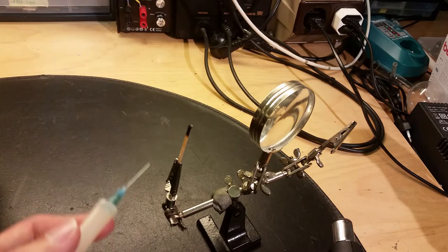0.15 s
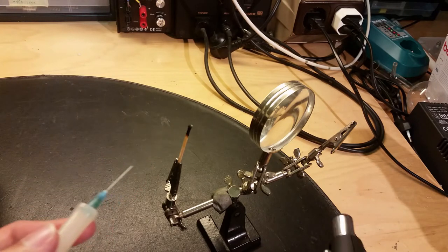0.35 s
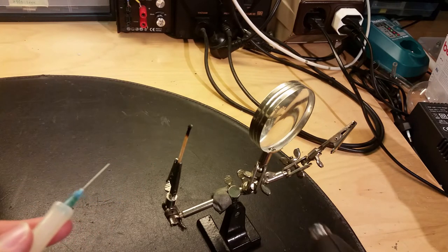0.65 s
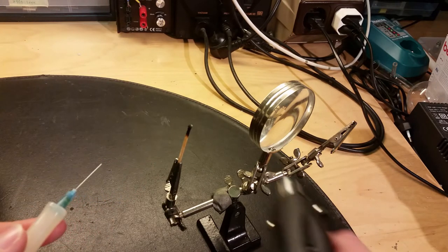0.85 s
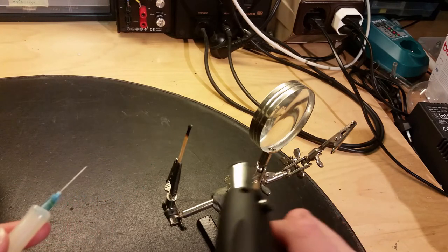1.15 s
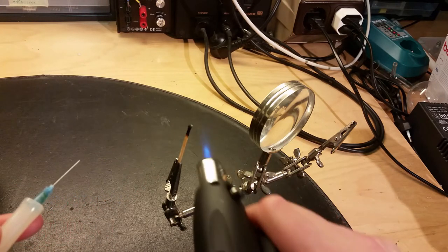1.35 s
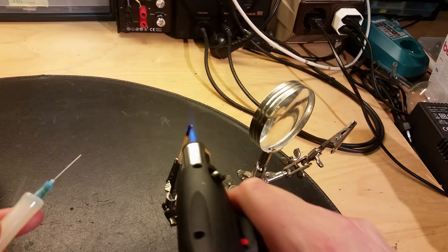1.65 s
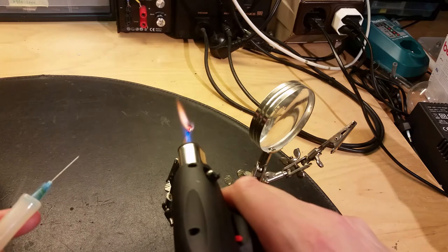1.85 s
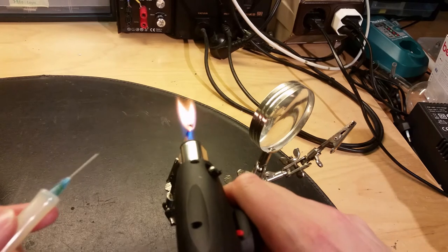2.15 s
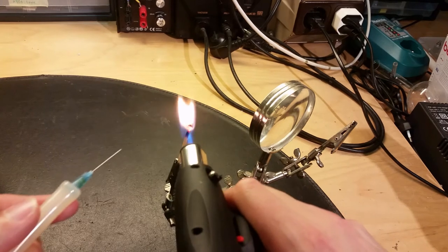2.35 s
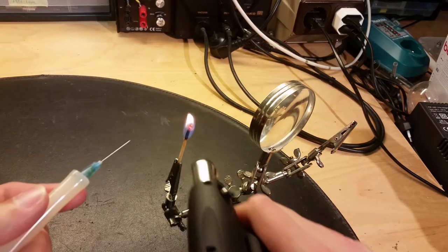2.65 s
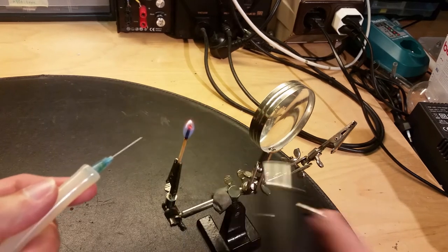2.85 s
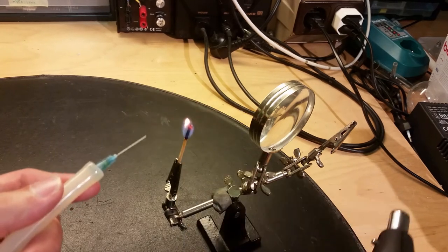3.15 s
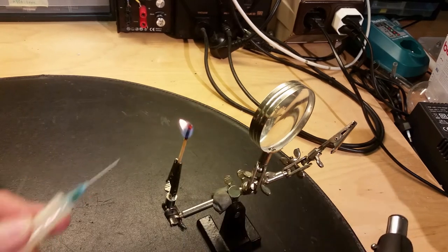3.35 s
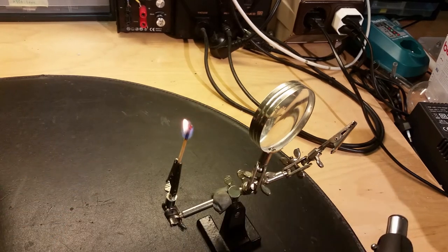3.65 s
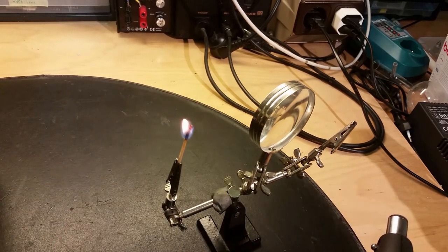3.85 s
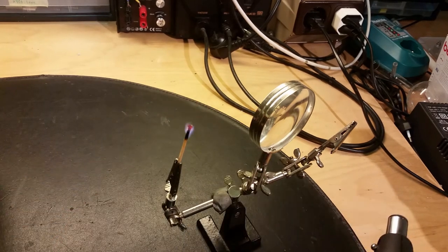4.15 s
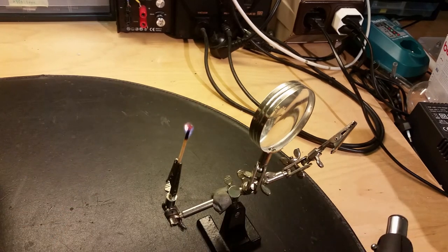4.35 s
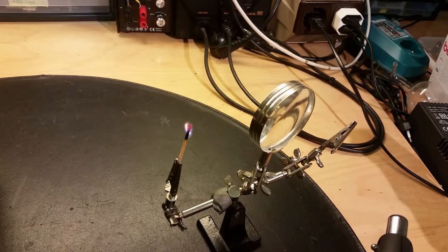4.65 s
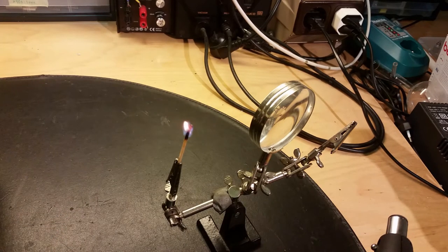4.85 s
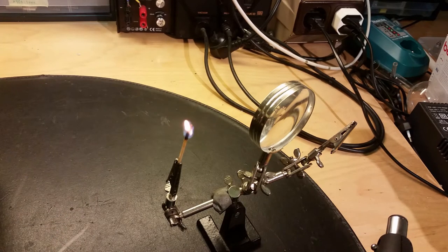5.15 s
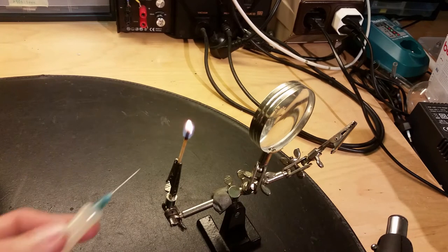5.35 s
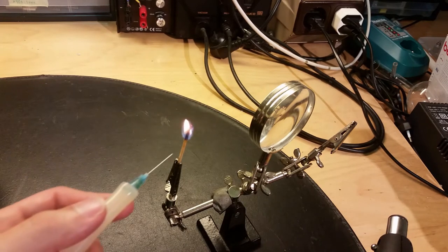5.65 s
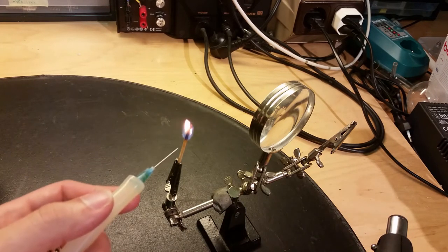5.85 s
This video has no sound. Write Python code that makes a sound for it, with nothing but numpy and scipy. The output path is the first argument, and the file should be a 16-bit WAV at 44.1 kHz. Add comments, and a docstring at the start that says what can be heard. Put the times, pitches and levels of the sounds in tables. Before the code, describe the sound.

Fast low pump chugging to the left; a gas torch snaps alight, rushes for a second, clicks off and is set down with a hiss.

```python
"""A small piston compressor throbs to the left: knocks ring its casing and air puffs through its valves.
Beside it a hand gas torch is picked up, unlatched, lit with a snap, burns for a second, clicks off
and is set down; a thin hiss follows. Soon after the lighting, compressor and flame sink, then recover.
Struck parts are sums of dying tones; air, gas and rubbing are coloured noise shaped in time."""
import sys
import numpy as np
from scipy import signal
from scipy.fft import rfft, irfft, next_fast_len
from scipy.io import wavfile
from scipy.ndimage import uniform_filter1d

SR = 44100
rng = np.random.default_rng(int(sys.argv[2]) if len(sys.argv) > 2 else 0)


def generate_wav(sig):
    """Save sig (samples, or channels by samples) to the path in sys.argv[1] as 16-bit PCM at SR."""
    pcm = np.round(np.clip(np.atleast_2d(sig).T, -1, 1) * 32767).astype(np.int16)
    wavfile.write(sys.argv[1], SR, pcm)


N = 265305
T = np.arange(N) / SR  # time (s)

# colour of the gas jet, also lent to the rustle of handling: f/Hz, level per Hz/dB
JET = [(1000, 3), (1500, 9.5), (2900, 1), (3900, 4), (5500, 2.5), (7200, 7), (9500, -3.5), (13000, -0.5),
       (14500, -11)]


def compressor():
    """Knocks, hum, valve puffs and rushing air are timed by one shaft; the motor whines above them."""
    # colour of the steady air hiss: f/Hz, level per Hz/dB
    air_colour = [(1500, -8.5), (3200, -1), (4000, 5.5), (5800, -4.5), (7450, 5.5), (8200, 1.5),
                  (10200, -43.5), (12300, -1.5), (14500, -9.5)]
    # level of the low throb over time: t/s, level/dB
    throb_level = [(0, 0), (.44, 0), (.52, -5), (1.4, -4.5), (2.3, 0.5), (6, -0.5)]
    knock_db, swell_db_per_s = -43, 0.5  # the knocks grow a little louder as it runs
    rush_db, compressor_db = -42.5, 2.78

    turn = shaft()
    knocks = casing(turn)
    body = knocks + undb(-14) * room(knocks, t60=.15)
    swelling_knocks = undb(knock_db + swell_db_per_s * T) * body
    throb = (swelling_knocks + shaft_hum(turn)) * undb(np.interp(T, *np.transpose(throb_level)))
    hiss = pan(undb(-66.5) * noise(air_colour), db=3)
    airflow = motor_whine() + valve_puffs(turn) + undb(rush_db) * rush(turn, knocks) + hiss
    return undb(compressor_db) * (throb + airflow) * sink()


def shaft():
    """Turns made so far: steady running, with the shaft falling behind or gaining as its load changes."""
    # the shaft falls behind, roughly keeps pace, then gains: t/s, turns ahead of steady running
    shaft_lead = [(0.0, 0.017), (0.06, -0.079), (0.2, -0.193), (0.44, -0.322), (0.58, -0.3), (1.28, -0.34),
                  (1.43, -0.308), (1.9, -0.344), (2.13, -0.388), (2.78, -0.306), (3.11, -0.368),
                  (3.8, -0.348), (3.95, -0.326), (4.17, -0.239), (4.59, -0.206), (4.82, -0.149),
                  (5.29, -0.088), (6.01, 0.079)]
    turns_per_s, wobble_turns = 21.45, 0.0043
    times, lead = np.transpose(shaft_lead)
    drift = uniform_filter1d(np.interp(T, times, lead), size=2048)
    return turns_per_s * T + drift + wobble_turns * walk(8)


def casing(turn, scatter_db=.9, turn_db=.6):
    """Piston and valve knocks, never quite even, ring the casing."""
    # knocks within one turn: place in the turn (0-1), level/dB
    knock_places = [(.087, 0), (.172, .5), (.642, -5), (.792, 3), (.997, -6)]
    # casing resonances: f/Hz, width/Hz, level/dB
    casing_modes = [(123.44, 9.1, 9.5), (228, 74, 1.5), (281, 9.8, -8), (301.7, 10, -3), (393, 80, -22),
                    (694, 120, -3.5), (800, 73, -20)]
    place, db = np.transpose(knock_places)
    turns = np.arange(int(turn[-1]) + 1)
    places = (turns[:, None] + place).ravel()
    chance = rng.standard_normal((len(places), 2))
    jitter_s = .00008 * chance[:, 0]
    times = np.interp(places, turn, T, right=T[-1] + 1) + jitter_s
    load_db = turn_db * rng.standard_normal((len(turns), 1))
    sizes = undb((db + load_db).ravel() + scatter_db * chance[:, 1])
    kicks = np.bincount((np.maximum(times, 0) * SR).astype(int), sizes, N)[:N]
    # rubber feet take out the lowest bass; the soft contact takes out the treble
    kicks = resonate(-kicks, 177, 390)
    return unit(sum(undb(db) * resonate(kicks, hz, width) for hz, width, db in casing_modes))


def shaft_hum(turn):
    """Multiples of the turn rate; higher ones waver more, the lowest reach the bench with lags of their own."""
    # steady hum: multiple of the turn rate, level/dB
    hum_orders = [(2, -62.5), (3, -61.5), (4, -58), (5, -72), (6, -54.5), (8, -63), (12, -62.5), (14, -58),
                  (18, -59.5), (20, -51.5)]
    hum = 0
    for k, db in hum_orders:
        lag_turns = rng.random() if k < 6 else 0
        waver_db = min(k / 5, 1.5) * walk(5)
        tone = np.sqrt(2) * np.cos(2 * np.pi * (k * turn + lag_turns))
        hum = hum + undb(db + waver_db) * tone
    return hum


def valve_puffs(turn):
    """Bands of noise swell and fade at set places in every turn as air passes the valves."""
    # puffs within one turn: place in the turn (0-1), length/turns, f/Hz, width of each filter/Hz, level/dB
    puff_places = [(.11, .026, 1904, 450, -52.5), (.19, 0.12, 712, 130, -52), (.25, 0.078, 990, 250, -48),
                   (.25, 0.037, 1985, 700, -50.5), (.34, .05, 435, 150, -51), (.37, 0.086, 2816, 400, -59),
                   (.48, 0.046, 2547, 260, -58), (.76, 0.089, 470, 170, -48), (.76, 0.026, 2700, 300, -58),
                   (.86, 0.098, 2794, 450, -57.5)]
    puffs = 0
    breeze = noise([(100, 42.5), (2900, -22.0), (3300, -34.0)])
    for place, length, hz, width, db in puff_places:
        distance = (turn - place + .5) % 1 - .5
        gate = np.exp(-.5 * (distance / length) ** 2)
        air = steady(resonate(resonate(breeze, hz, width), hz, width))
        # the higher puffs are more directional
        puffs = puffs + pan(undb(db) * gate * air, db=9.4 * min(hz / 2000, 1) ** 2)
    return puffs


def steady(x):
    """Even out the strength of a noise, so that every puff is about as strong as the last."""
    average_s = .008
    power = uniform_filter1d(np.mean(x ** 2, axis=0), size=int(average_s * SR))
    return x / np.sqrt(power)


def rush(turn, knocks, size=16384):
    """Pumped air and small rattles: a part repeats with every turn, and all surges with the knocks."""
    # colour of the pumped air and cooling fan: f/Hz, level per Hz/dB
    rush_colour = [(25, -30.5), (90, -7.5), (200, -1.5), (275, 4.5), (350, -10.5), (420, -5), (510, -7.5),
                   (570, -15.5), (710, -4), (790, -6.5), (950, -7), (1150, -13), (1420, -11), (1520, -19),
                   (1620, -11), (1760, -25.5), (2100, -17), (2350, -34), (2580, -23), (2950, -22.5),
                   (3200, -44), (4500, -88)]
    hz, db = np.transpose(rush_colour)
    orders_hz = np.arange(1, size // 2) * turn[-1] / T[-1]
    gains = undb(np.interp(np.log(orders_hz), np.log(hz), db))
    gains = gains * (orders_hz > 450)  # no repeating part in the bass
    random_phases = np.exp(2j * np.pi * rng.random(len(gains)))
    one_turn = irfft(np.append(0, gains * random_phases), size)
    rattle = np.interp(turn, np.arange(size) / size, one_turn, period=1)
    knock_strength = np.sqrt(np.abs(uniform_filter1d(knocks ** 2, size=300)))
    surge = unit(1 + 0.054 * knock_strength)
    return surge * (undb(-17.0) * unit(rattle) + noise(rush_colour))


def motor_whine():
    """Thin tones, mostly of the motor, each wandering a little in pitch and loudness."""
    # thin tones, mostly of the motor; the one at 428 Hz sits by the shaft's 20th multiple: f/Hz, level/dB
    whine_tones = [(399, -60), (428, -59), (515, -65), (612, -63), (663, -63), (701, -53), (722, -57),
                   (740, -60), (772, -66), (843, -61), (900, -64), (955, -62), (1409, -58), (2590, -71),
                   (2826, -67)]
    whine = 0
    for hz, db in whine_tones:
        phase = 2 * np.pi * np.cumsum(hz * (1 + 0.00388 * walk(14))) / SR
        whine = whine + undb(db + 2.5 * walk(6)) * np.sqrt(2) * np.sin(phase)
    return whine


def sink():
    """Gain that eases down for most of a second and comes back."""
    from_s, until_s, depth_db = 1.417, 2.207, -12.5
    fall_s, recover_s = 0.26, 0.33  # time constants
    down = 1 - np.exp(-np.maximum(np.minimum(T, until_s) - from_s, 0) / fall_s)
    back = np.exp(-np.maximum(T - until_s, 0) / recover_s)
    return undb(depth_db * down * back)


def clicks(crack_t60=0.0056, wash_t60=0.31, wash_db=-12):
    """Latch, igniter and trigger: a bright crack and a short ring of the shell, both washed out by the room."""
    # clicks of the torch: t/s, shell ring/dB, its tilt/dB per octave, contact/s, crack/dB, room/dB,
    # left minus right/dB
    click_events = [(1.1834, -4, -3, .0007, -21.5, -11, 5), (1.3946, -12, -13, .0004, -6, -24, 4),
                    (1.399, -32, 0, .0004, -22, -8, 1), (2.6359, -25, 1, .0003, -12, -10, 5),
                    (2.6385, -36, 0, .0003, -19, -12, 2), (2.94, -61, 0, .0003, -45, 3, -1),
                    (3.3362, -50, 0, .0003, -24, -3, 5)]
    # modes of its plastic shell: f/Hz, t60/s, level/dB
    shell_modes = [(1130, .008, -25), (1450, 0.015, -3.5), (1620, .014, -16), (1910, 0.016, -11.5),
                   (2243, 0.02, -11), (2530, 0.017, -26), (2830, .02, -25)]
    # colour of the crack of each contact: f/Hz, level per Hz/dB
    crack_colour = [(700, -38), (1150, -10), (1500, 12), (2800, -1.5), (3600, -4), (5500, -1.5),
                    (7400, 12.5), (9500, 4), (13000, 5.5), (15000, 8.5)]
    # colour of the room wash after a crack: f/Hz, level per Hz/dB
    wash_colour = [(700, -22), (1500, 5), (2800, 1.5), (5500, 1.5), (7400, 6.5), (9500, 2.5), (12300, -1),
                   (15000, 8)]
    attack_s = .0006
    direct, wash, rings = 0, 0, 0
    crack, diffuse = noise(crack_colour), noise(wash_colour)
    for start, shell_db, tilt_db, contact_s, crack_db, room_db, pan_db in click_events:
        # the tilt sets how strongly the higher modes ring
        modes = [(hz, t60, db + tilt_db * np.log2(hz / shell_modes[0][0])) for hz, t60, db in shell_modes]
        # the small shell radiates no bass
        shell = undb(shell_db) * highpass(ring(modes, start, contact_s), 950)
        snap = undb(crack_db) * .5 * crack * envelope(start, start + attack_s, attack_s, crack_t60)
        direct = direct + pan(shell + snap, pan_db)
        wash = wash + undb(crack_db + room_db + wash_db) * fade(start, wash_t60)
        rings = rings + undb(room_db) * shell
    return direct + wash * diffuse + undb(-9) * room(rings, t60=.12)


def clacks():
    """The hard foot of the torch is knocked in handling, then meets the bench and chatters to rest."""
    # clacks of the foot on the bench and of the hand's grip: t/s, level/dB, left minus right/dB
    clack_events = [(.7662, -49, 4), (2.759, -49, 2), (3.3358, -29, 5), (3.353, -40, -2), (3.364, -46, 0)]
    # modes of the hard foot: f/Hz, t60/s, level/dB
    foot_modes = [(1740, .02, -2), (2120, .02, 0), (2420, .018, -1), (2880, .02, 0), (3200, .016, -1),
                  (3560, .018, -14), (4140, .016, -9)]
    direct, rings = 0, 0
    for start, db, pan_db in clack_events:
        clack = undb(db) * ring(foot_modes, start, contact_s=.0004)
        direct = direct + pan(clack, pan_db)
        rings = rings + clack
    return direct + undb(-7) * room(rings, t60=.16)


def gas():
    """Gas spurts as the valve opens and shuts, the flame rushes between; later a thin hiss."""
    # gas spurts as the torch valve opens and shuts: t/s, level/dB
    spurt_events = [(1.415, -37), (2.64, -48)]
    # colour of the flame: f/Hz, level per Hz/dB
    flame_colour = [(100, 10), (400, -2), (850, 17.5), (1150, 12.5), (1500, 15.5), (1800, 8), (2100, 14),
                    (2800, -4), (3400, -5), (8000, -11.5), (11000, -34)]
    # colour of the thin hiss: f/Hz, level per Hz/dB
    hiss_colour = [(2500, -10), (4100, -6), (5800, -11), (7300, 1), (10000, -.5), (14500, -.5)]
    attack_s, hold_s, spurt_t60 = .003, 0.006, 0.38
    flame_db, jet_db = -41.5, -72  # the flame burns over a faint jet of gas
    hiss_from_s, hiss_until_s = 3.335, 4.26
    hiss_db, hiss_swell_db_per_s = -56.5, 2  # starting level, and how it grows

    spurts = 0
    for start, db in spurt_events:
        spurts = spurts + undb(db) * envelope(start, start + attack_s + hold_s, attack_s, spurt_t60)
    flutter = undb(0.89 * walk(440))
    opens, shuts = spurt_events[0][0], spurt_events[1][0]
    burn = envelope(opens, shuts, attack_s=.2, t60=0.12) * sink()
    jet = (spurts * flutter + undb(jet_db) * burn) * noise(JET)
    flame = undb(flame_db) * burn * noise(flame_colour)
    hiss_level = undb(hiss_db + hiss_swell_db_per_s * (T - hiss_from_s))
    hiss_shape = envelope(hiss_from_s, hiss_until_s, attack_s=.01, t60=0.75)
    hiss = hiss_level * hiss_shape * noise(hiss_colour)
    return pan(jet + flame, db=1.0) + pan(hiss, db=2.0)


def handling():
    """The torch rubs, crackles and squeaks over the mat in uneven slips and bumps the bench."""
    # rubs of hand and torch on the mat: start t/s, end t/s, release t60/s, rustle/dB, squeak/dB
    rub_events = [(.422, .478, .12, -60, -54), (.508, .585, .12, -59, -45), (.562, .59, .05, -62, -44.5),
                  (.758, .772, .07, -56, -53), (.826, .89, .4, -53, -54)]
    # squeak resonances: f/Hz, width before widening/Hz, level/dB
    squeak_modes = [(2272, 180, -4.5), (2440, 200, -12), (2803, 100, -6.5), (3100, 77, -8),
                    (3900, 170, -10.5), (4270, 230, -15)]
    # bumps on the bench: t/s, level/dB, pitch factor, decay stretch factor
    bump_events = [(0.8336, -20.5, 1.173, 2.04), (3.329, -34.5, 0.914, 5.2), (3.35, -25, 0.72, 0.46),
                   (3.375, -33, 0.667, 4.8)]
    # modes of the bench top, before pitch and stretch: f/Hz, t60/s, level/dB
    bench_modes = [(108.3, 0.047, -4.5), (178, 0.049, -1.5), (234, 0.076, -1.5), (850, .018, -25),
                   (1160, .022, -14)]
    mat_hz = 1110  # the mat softens bumps above this

    rustle = noise(JET) * unit(1 + 0.7 * crackle(per_s=400, spread_db=14))
    slips = undb(3 * walk(400) + walk(70))
    friction = noise([(100, 0), (10000, 0)]) * slips
    squeak = 0
    for hz, width, db in squeak_modes:
        wide = 1.45 * width
        squeak = squeak + undb(db) * resonate(resonate(friction, hz, wide), hz, wide)
    squeak = unit(squeak)
    rubs = 0
    for start, end, t60, rustle_db, squeak_db in rub_events:
        rub = undb(rustle_db) * rustle + undb(squeak_db) * squeak
        rubs = rubs + envelope(start, end, attack_s=0.0053, t60=t60) * rub
    bumps = 0
    for start, db, pitch, stretch in bump_events:
        modes = [(hz * pitch, t60, level) for hz, t60, level in bench_modes]
        bumps = bumps + undb(db) * ring(modes, start, contact_s=0.00033, stretch=stretch)
    cushion = signal.butter(2, mat_hz, fs=SR, output="sos")
    bumps = signal.sosfilt(cushion, highpass(bumps, 53))
    return rubs + bumps + undb(-8.0) * room(bumps, t60=0.21)


def crackle(per_s, spread_db):
    """Level of sparse tiny catches of uneven size, each dying away in about a millisecond."""
    catch_s = .0008  # time constant
    chance = rng.random((2, N))
    catches = (chance[0] < per_s / SR) * undb(spread_db * chance[1])
    return unit(signal.lfilter([1], [1, -np.exp(-1 / (catch_s * SR))], catches))


def room(x, t60=.3):
    """Diffuse reflections of a small workshop, different in each ear."""
    tail = rng.standard_normal((2, SR // 2)) * fade(0.0013, t60)[:SR // 2]
    tail /= np.sqrt(np.sum(tail ** 2, axis=1, keepdims=True))
    return signal.fftconvolve(np.atleast_2d(x), tail, axes=1)[:, :N]


def ring(modes, start, contact_s, stretch=1):
    """Struck modes build up while the contact lasts, then die away."""
    age = T[:SR // 2]
    sound = 0
    for hz, t60, db in modes:
        decay = np.exp(-np.log(1000) * age / (t60 * stretch))
        sound = sound + undb(db) * np.sin(2 * np.pi * hz * age) * decay
    build_up = 1 - np.exp(-(age / contact_s) ** 2)
    return np.pad(sound * build_up, (int(start * SR), N))[:N]


def noise(colour):
    """Stereo noise of a given spectrum, its left and right alike to a degree that depends on pitch."""
    # likeness of left and right: f/Hz, likeness (0-1)
    likeness = [(100, .9), (300, 1), (600, .2), (900, .5), (1400, .25), (1800, .6), (2900, .7), (3400, .15),
                (7000, .18)]
    size = next_fast_len(N)
    log_hz = np.log(np.fft.rfftfreq(size, 1 / SR) + 1)
    db, alike = (np.interp(log_hz, np.log(np.array(p)[:, 0]), np.array(p)[:, 1]) for p in (colour, likeness))
    alike = np.clip(alike, 0, 1)
    spectra = rfft(rng.standard_normal((2, size))) * undb(db)
    mid, side = spectra * np.sqrt([1 + alike, 1 - alike])
    return unit(irfft([mid + side, mid - side], size)[:, :N])


def walk(rate):
    """Random wandering around 0, in straight lines between 'rate' random points a second."""
    knots = rng.standard_normal(int(N / SR * rate) + 2)
    return np.interp(T * rate, np.arange(len(knots)), knots)


def envelope(start, until, attack_s, t60):
    """Attack from a start time, hold, then an exponential release."""
    release = np.exp(-np.log(1000) * np.clip((T - until) / t60, 0, 10))
    return np.clip((T - start) / attack_s, 0, 1) * release


def fade(start, t60):
    """Exponential decay from a start time, falling 60 dB in t60 seconds."""
    return (T >= start) * np.exp(-np.log(1000) * np.clip((T - start) / t60, 0, 10))


def resonate(x, hz, width_hz):
    """One resonance with gain 1 at its centre."""
    return signal.lfilter(*signal.iirpeak(hz, hz / width_hz, fs=SR), x)


def highpass(x, hz):
    """Take out what lies below a frequency."""
    return signal.sosfilt(signal.butter(3, hz, "high", fs=SR, output="sos"), x)


def pan(x, db):
    """Tip a sound to the left by a level difference."""
    return x * undb(np.array([[db], [-db]]) / 2)


def unit(x):
    """Scale to rms 1."""
    return x / np.sqrt(np.mean(x ** 2))


def undb(db):
    """Decibels to gain."""
    return 10 ** (np.asarray(db) / 20)


def scene():
    """The compressor stands to the left, so it reaches the right side later."""
    right_lag_s = .00041
    left, right = compressor()
    pump = np.array([left, np.interp(T - right_lag_s, T, right)])
    return pump + clicks() + clacks() + handling() + gas()


def record(dry):
    """Round the sharpest peaks softly and cut the top steeply."""
    peak_limit, top_hz = .55, 14600
    rounded = peak_limit * np.tanh(dry / peak_limit)
    return signal.sosfilt(signal.ellip(10, .2, 70, top_hz, fs=SR, output="sos"), rounded)


dry = scene()
out = record(dry)
generate_wav(out)
```